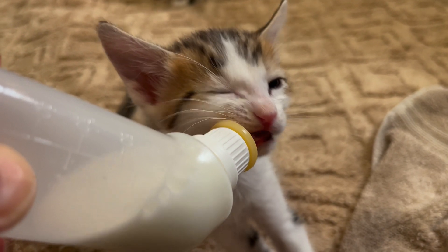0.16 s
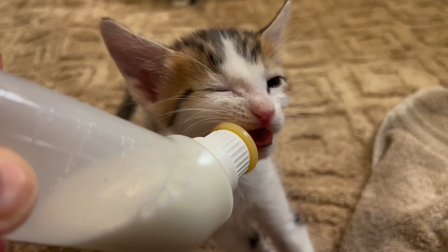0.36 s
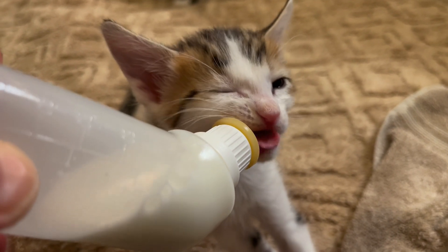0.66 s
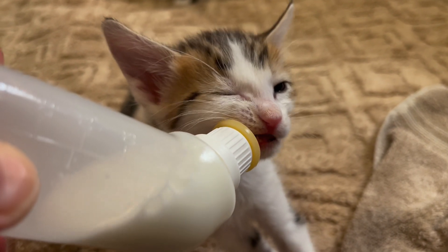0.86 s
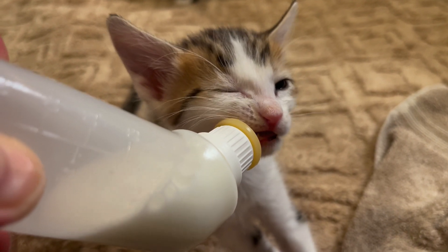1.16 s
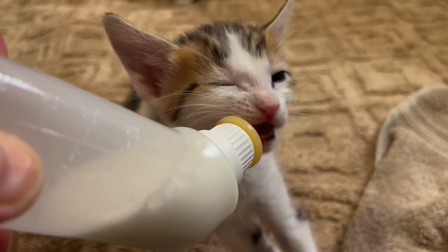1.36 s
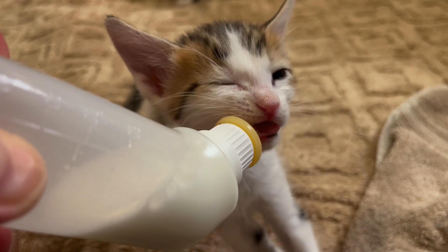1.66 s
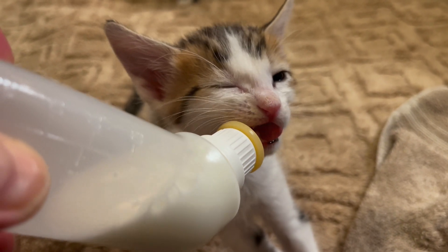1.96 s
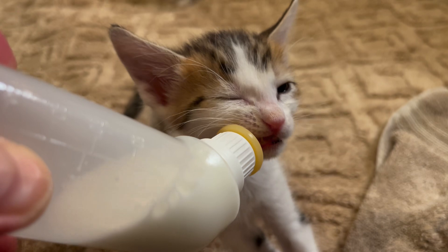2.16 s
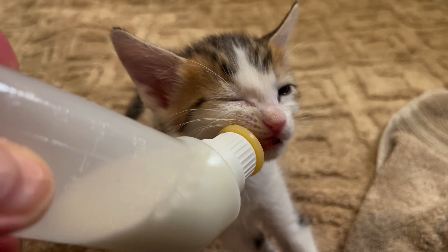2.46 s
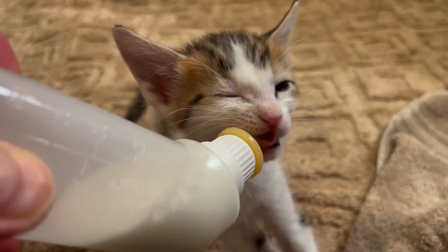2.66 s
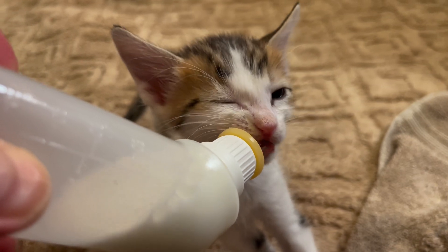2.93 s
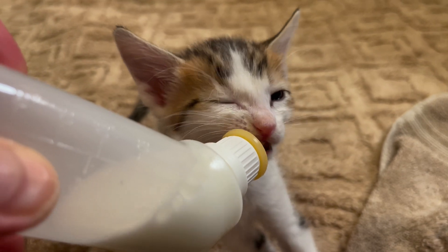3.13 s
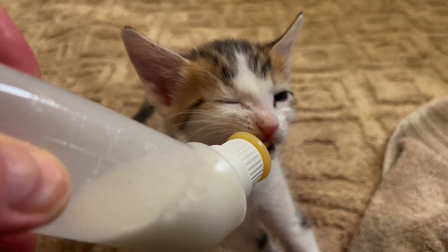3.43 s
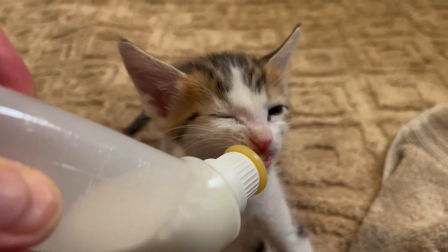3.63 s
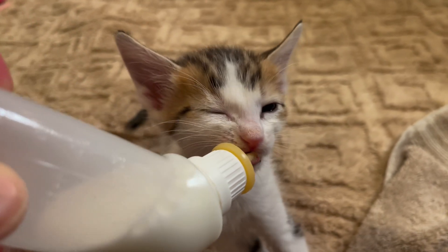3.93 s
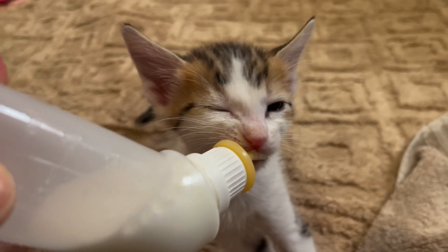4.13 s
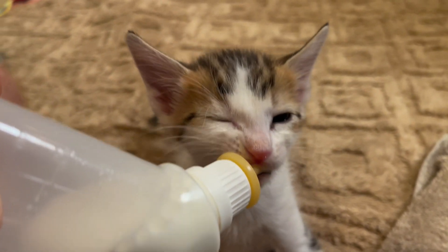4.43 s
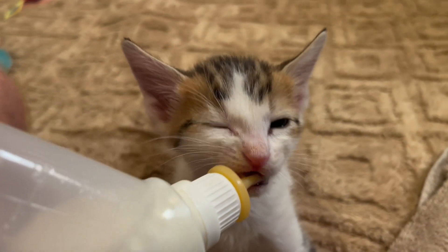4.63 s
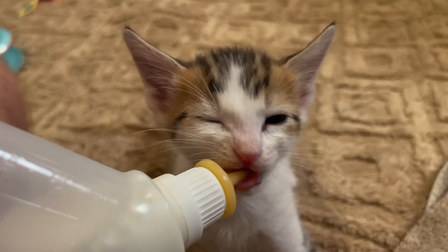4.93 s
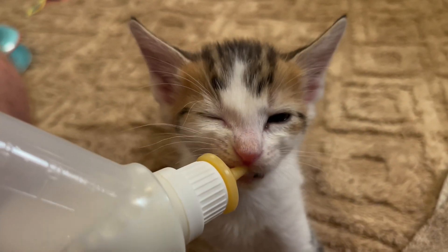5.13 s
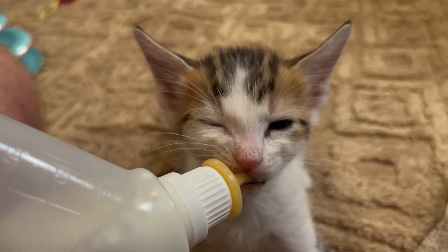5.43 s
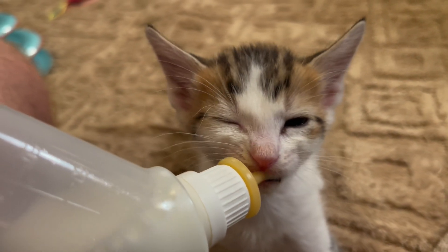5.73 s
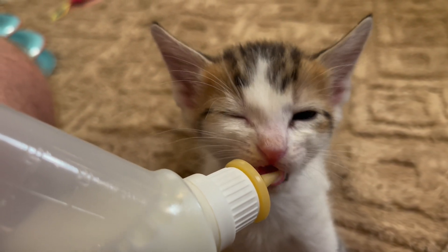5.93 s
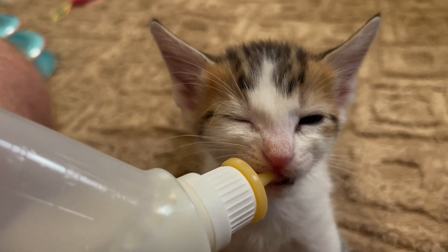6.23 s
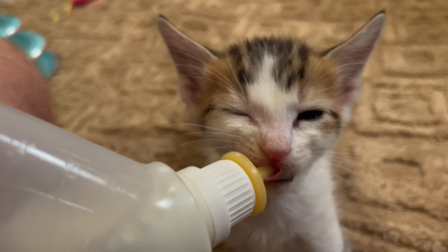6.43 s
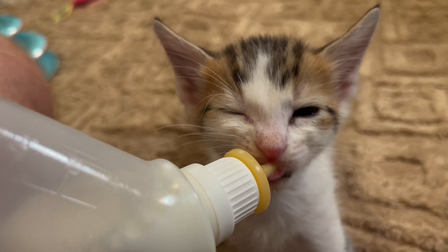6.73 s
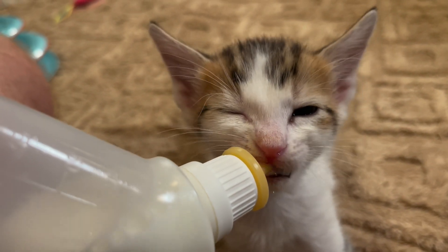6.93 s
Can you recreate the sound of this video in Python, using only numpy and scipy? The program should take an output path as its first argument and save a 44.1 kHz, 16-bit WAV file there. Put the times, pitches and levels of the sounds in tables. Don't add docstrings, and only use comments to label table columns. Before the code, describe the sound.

A kitten sucks milk from a bottle teat a hand's breadth from a stereo microphone in a quiet, soft-furnished room. Sharp, very short wet snaps arrive irregularly, roughly three a second: strong ones at 0.03, 0.33 and 0.96 s, a brief squelchy break at 1.27 and another snap near 1.7. A longer bubbly squelch runs at 1.9 s. Sucks are softer afterwards, with snaps at 2.3, 2.6 and 3.4, a lower squelch at 3.93, then wet smacks around 4.6, 4.85, 5.25 and 5.54. Fizzy bubble runs follow at 5.85 and 6.16, a duller one at 6.43, and crisp snaps at 6.86 and 7.08. Between them are tiny droplet ticks, fine milk fizz and barely audible nasal whispers. Low mains hum and ventilation rumble lie underneath, surging gently just before 3.2 s, then easing; a thin fluttering motor whine grows slightly clearer after 3.5 s.

```python
import sys
import numpy as np
from scipy import signal
from scipy.fft import rfft, irfft, next_fast_len
from scipy.io import wavfile
from scipy.ndimage import uniform_filter1d

SR = 44100
rng = np.random.default_rng(int(sys.argv[2]) if len(sys.argv) > 2 else 0)


def convert_level_to_amplitude(level_db):
    exponent = np.asarray(level_db, float) / 20
    return 10 ** exponent


def bounce(signal):
    frames = np.transpose(np.atleast_2d(signal))
    limited = np.clip(frames, -1, 1)
    pcm = np.round(limited * 32767).astype(np.int16)
    wavfile.write(sys.argv[1], SR, pcm)


N = 312228

# (centre [Hz], width [Hz], level [dB])
MOUTH_MODES = [(4100, 651, -2), (5600, 340, 3.5), (6700, 400, 3)]
# (centre [Hz], width [Hz], level [dB])
CHEEK_MODES = [(1360, 730, 2), (2190, 630, 5), (3000, 900, -11)]
# (centre [Hz], width [Hz], level [dB])
SPRAY_MODES = [(8600, 180, 1.5), (10900, 4500, -3.5)]
# (frequency [Hz], lead of the left [rad], left over right [dB])
PORT_OFFSETS = [(0, 0, 0), (800, 1, 1), (1550, 1, -5), (2050, 6.2, -6), (2600, 6.9, 10), (3100, 8, 10),
                (3500, 12, 0), (4200, 12.8, -2), (5000, 15.3, -1), (6000, 18.8, 2), (6700, 18.3, 1),
                (7300, 20, 1), (8000, 19.5, 1), (16000, 5.6, 0)]
WET_DAMPING, FIZZ_DAMPING = 1.6, 2.0


def evened(x):
    return x / np.sqrt(np.mean(x ** 2) + 1e-20)


def peaked(x):
    return x / (abs(x).max() + 1e-20)


def add(mix, s, sound):
    part = mix[round(s * SR):][:len(sound)]
    part += sound[:len(part)]


def ring(x, hz, width):
    turn = np.exp(2j * np.pi * np.cumsum(hz * np.ones(len(x))) / SR)
    r = np.exp(-np.pi * width / SR)
    return 2 * (turn * signal.lfilter([(1 - r) ** 2], [1, -2 * r, r * r], x / turn)).real


def modes(x, table, scale=1, damping=1):
    return sum((-1) ** k * convert_level_to_amplitude(db) * ring(x, hz * scale, width * damping)
               for k, (hz, width, db) in enumerate(table))


def drift(seconds):
    size = round(seconds * SR)
    once = uniform_filter1d(rng.standard_normal(N), size, mode="wrap")
    return evened(uniform_filter1d(once, size, mode="wrap"))


def kitten():
    out = seethe()
    for sounds in (snaps(), squelches(), droplets(), edges()):
        for s, sound in sounds:
            add(out, s, sound)
    add(out, 0.025, convert_level_to_amplitude(-33.5) * ring(out, 10000, 3600))
    for s, sound in whispers():
        add(out, s, sound)
    return signal.sosfilt(signal.butter(2, 750, "high", fs=SR, output="sos"), out)


def breaks():
    # (time [s], peak [dB], length [ms], mouth re peak [dB], cheek pop re peak [dB])
    seals = [(0.0256, -9, 2.76, -9, -17.5), (0.3313, -15, 1.6, -11, -40), (0.333, -4, 1.3, -18.5, -28),
             (0.616, -38, 1.9, -5, -10.5), (0.959, -2, 1.8, -13.5, -35.5), (0.9597, -17, 2.5, -1.5, -21),
             (1.131, -44, 3.1, -11, -12.5), (1.275, -17.5, 4.2, -8.5, -21),
             (1.2763, -16.5, 0.68, -3.5, -50), (1.591, -30.5, 2.9, -7.5, -16.5),
             (1.6945, -14.5, 6.4, -23.5, -50), (2.3353, -23, 3.3, -28.5, -42), (2.594, -19, 2.2, -8, -20.5),
             (3.3667, -28, 3.6, 1.5, -13), (3.5078, -48, 1.6, 4.5, -2.5), (3.624, -24, 0.41, -5, -24),
             (4.2284, -24, 1.1, -33, -31), (4.849, -34.5, 2.24, -10, -9.5), (4.8534, -27, 4.4, -3.5, -12.5),
             (4.8549, -17, 2.6, -29.5, -31), (5.2529, -8.5, 1.5, -25.5, -52), (5.5402, -26, 4.5, -6.5, -14),
             (6.8616, -12, 2.23, -10, -23), (7.068, -33.5, 0.63, -5.5, -13.5),
             (7.0783, -9.5, 2.5, -5, -21.5)]
    # (time [s], peak [dB], pitch [Hz])
    large = [(1.595, -36, 10900), (1.601, -38, 10400), (1.9053, -38, 10500), (1.9094, -31, 10350),
             (1.9138, -24, 11740), (1.9202, -29, 11600), (1.924, -32, 11250), (1.927, -30, 11240),
             (1.9321, -28, 11100), (1.937, -31, 11300), (1.9446, -25.5, 10200), (1.948, -36.5, 10900),
             (1.954, -41, 10900), (1.9575, -47, 10130), (3.9314, -25, 8155), (3.9346, -24.5, 8180),
             (3.943, -29.5, 7600), (3.961, -34, 6430), (3.966, -36, 6200), (3.9668, -27, 6500),
             (4.5866, -23.5, 6880), (5.2347, -28, 10450), (5.2426, -30, 10060), (5.86, -29, 8900),
             (5.8637, -29, 8900), (5.8711, -24, 8700), (5.8796, -28, 7200), (6.1608, -34.5, 8630),
             (6.1664, -45, 10900), (6.1693, -28, 10050), (6.1782, -35, 6500), (6.1976, -23, 6700)]
    # (time [s], peak [dB], pitch [Hz])
    ticks = [(0.1923, -39, 8460), (0.1941, -39.5, 6740), (0.503, -49, 5700), (0.54, -53.5, 7040),
             (0.661, -47, 7850), (0.8387, -52, 5600), (0.847, -56, 6400), (0.885, -56, 8100),
             (1.144, -47, 7200), (1.4389, -54, 6400), (1.4437, -44, 8380), (2.1033, -36, 8110),
             (2.692, -55, 8190), (3.687, -46.5, 7300), (4.102, -57.5, 7840), (4.5889, -42, 4030),
             (4.1058, -49.5, 5770), (4.85, -36.5, 5200), (5.0482, -55.5, 7360), (5.2634, -42, 8600),
             (5.3884, -53, 6700), (5.5472, -23.5, 5600), (5.940, -53.5, 7250), (6.426, -29, 5180),
             (6.4302, -24, 5450), (6.939, -57.5, 6300)]
    # (time [s], peak [dB])
    pricks = [(.727, -56), (1.4035, -60), (1.668, -55), (1.764, -45), (1.858, -55), (2.4598, -49),
              (2.4982, -52), (2.948, -45.5), (3.339, -64), (3.4878, -44.5), (3.6688, -43), (3.838, -52.5),
              (3.8412, -51.5), (4.0972, -47), (4.2244, -43.5), (4.7, -48), (5.6963, -54), (6.6322, -54.5),
              (6.6528, -60), (6.7596, -45), (6.8497, -49), (6.856, -47.5), (6.8678, -51.5), (6.8725, -48)]
    # (time [s], peak [dB], pitch [Hz])
    lips = [(0.1489, -50, 4100), (0.2634, -48, 2510), (0.271, -56, 2880), (.463, -56.5, 4000),
            (0.569, -57.5, 3630), (0.657, -52, 4000), (0.9131, -54.5, 3740), (1.008, -50, 2480),
            (1.4615, -53.5, 4500), (1.515, -55, 2830), (2.0643, -54.5, 4240), (2.074, -46, 4480),
            (2.187, -66, 2800), (2.431, -54, 4100), (2.682, -56, 2500), (2.779, -57, 4430),
            (2.805, -47.5, 4730), (3.685, -52.5, 1800), (4.144, -52, 4000), (4.149, -50.5, 3320),
            (4.425, -55.5, 2306), (4.466, -53, 5100), (4.476, -61, 3780), (4.762, -57.5, 4000),
            (5.122, -49.5, 2800), (6.561, -59, 3670), (6.693, -54.5, 3340), (7.005, -56, 4000),
            (7.025, -61, 2450)]
    tick_mouth_db, tick_cheek_db = -5, -19.5
    rows = []
    for s, db, *rest in seals:
        hz = 11600 + 38 * db - 140 * s
        rows.append((s, db, hz, *rest))
    for s, db, hz in large:
        mouth_db = -16 + 4 * (10 - hz / 1000)
        rows.append((s, db, hz, 4.54, mouth_db, mouth_db - 15))
    for s, db, hz in ticks:
        rows.append((s, db, hz, 2.6, tick_mouth_db, tick_cheek_db))
    for s, db in pricks:
        rows.append((s, db, 9810, 1.6, tick_mouth_db, tick_cheek_db))
    for s, db, hz in lips:
        cheek_db = 5.5 - 12.5 * (hz / 1000 - 2.4)
        rows.append((s, db, hz, 7 / hz * 1000, -10, cheek_db))
    return rows


def snaps():
    t = np.arange(500) / SR * 1000
    size_spread = .05
    for s, db, hz, ms, mouth_db, cheek_db in breaks():
        noise = rng.standard_normal(len(t))
        mouth_size, cheek_size = 1 + size_spread * noise[-2], 1 + 2 * size_spread * noise[-3]
        u = t / max(ms, .5)
        shape = np.minimum(t / 0.67, 1) * np.exp(-(1.93 * u) ** 2)
        tear = noise * shape
        late = noise[::-1] * u * np.exp(-3.4 * u)

        wobble = evened(uniform_filter1d(noise, size=24)) * np.minimum(u, 1)
        tone = np.sin(2 * np.pi * hz * t / 1000 + 0.58 * wobble[::-1])
        bubble = shape * (1 + .25 * wobble) * tone
        spray = modes(tear, SPRAY_MODES[:1], 1 + size_spread * noise[-1], WET_DAMPING)
        spray = spray + modes(tear, SPRAY_MODES[1:])
        top = peaked(bubble) + .5 * peaked(ring(tear, hz, 0.18 * hz))
        top += convert_level_to_amplitude(-9.0) * (hz / 11000) ** 2 * peaked(spray)

        cavity = peaked(modes(late, MOUTH_MODES, mouth_size, WET_DAMPING))
        cavity = cavity + 0.46 * peaked(ring(late, 5200, 3300))
        cheek = peaked(modes(late, CHEEK_MODES, cheek_size))
        body = convert_level_to_amplitude(mouth_db - 7) * peaked(cavity) + convert_level_to_amplitude(cheek_db) * cheek
        yield s, convert_level_to_amplitude(db) * (peaked(top) + convert_level_to_amplitude(-33.5) * peaked(tear) + body)


def squelches():
    # (start [s], length [s], level [dB], fade over its length [dB], start pitch [Hz])
    runs = [(1.128, 0.026, -55, 11, 8260), (1.27, 0.014, -26.5, 5, 11900), (1.592, 0.0092, -43, -7, 10500),
            (1.9, 0.069, -46, 19.5, 11500), (2.329, 0.012, -34.5, 6, 10240), (3.365, 0.0097, -38, 6, 6500),
            (3.925, 0.043, -40, 1.1, 7800), (4.569, .022, -45, -20.5, 6800),
            (5.231, 0.0213, -34, -14.5, 9950), (5.54, 0.0079, -35, -0.5, 5860),
            (5.852, 0.037, -36, 2.5, 10300), (6.157, 0.0454, -45, -24.5, 9000),
            (6.426, 0.011, -48, -13, 4400)]
    sag_hz_per_s, release_s = 49000, 0.003
    for s, length, db, fade_db, hz in runs:
        n = round(length * SR)
        i = np.arange(n)
        noise, draw, size = rng.standard_normal((3, n))
        bursts = signal.lfilter([1], [1, -.94], (draw > 1.9) * convert_level_to_amplitude(3.0 * size)) + .5
        froth = noise * bursts
        top = evened(ring(froth, hz - sag_hz_per_s * i / SR, 2740))
        top += convert_level_to_amplitude(-2.5) * evened(modes(froth, SPRAY_MODES))
        body = convert_level_to_amplitude(-18.0) * evened(modes(froth, MOUTH_MODES, 1, FIZZ_DAMPING))
        body += convert_level_to_amplitude(-22) * evened(ring(froth, 3340, 5000))
        body += convert_level_to_amplitude(-29.5) * evened(modes(froth, CHEEK_MODES))
        attack = np.minimum(i / 110, 1)
        release = np.minimum(i[::-1] / np.minimum(release_s * SR, n / 4), 1)
        level = convert_level_to_amplitude(db + fade_db * np.linspace(.5, -.5, n))
        yield s, level * (evened(top) + body) * attack * release


def droplets():
    # (time [s], peak [dB], pitch [Hz])
    strays = [(0.502, -50, 9500), (.558, -57, 4500), (.661, -51, 10500), (.683, -59.5, 2300),
              (1.011, -54, 8600), (1.395, -64.5, 4200), (1.422, -59.5, 6000), (1.468, -58, 7000),
              (1.496, -57.5, 6400), (1.735, -55, 4300), (1.749, -51, 7500), (1.748, -60, 2280),
              (1.797, -58, 7500), (1.956, -48, 2100), (1.984, -42, 11300), (2.155, -67, 6000),
              (2.27, -68, 2590), (2.453, -51, 8000), (2.594, -26.5, 8600), (2.735, -60, 6770),
              (2.835, -59, 8500), (2.9467, -58, 2510), (3.017, -62.5, 2500), (3.219, -63, 3000),
              (3.391, -57.5, 2410), (3.522, -56, 4300), (3.56, -66, 3800), (0.3336, -21, 8900),
              (3.823, -60.5, 9000), (4.122, -57, 6000), (4.254, -60, 2600), (4.492, -59, 3600),
              (4.513, -61.5, 3500), (4.589, -40.5, 2300), (4.591, -35, 6750), (5.068, -59, 6800),
              (5.077, -58, 1600), (5.142, -60, 9500), (5.318, -54.5, 6500), (5.379, -60, 6300),
              (5.453, -65, 3800), (5.707, -58.5, 4000), (5.706, -56.5, 8560), (6.8616, -27, 8550),
              (6.075, -64.5, 3800), (6.152, -56, 3920), (6.151, -52.5, 9000), (6.881, -47, 8800),
              (6.965, -63, 6300)]
    for s, db, hz in strays:
        u = np.arange(500) / SR * hz / 9.6
        burst = rng.standard_normal(500) * u * np.exp(-3 * u)
        wide = convert_level_to_amplitude(-10) * peaked(ring(burst, 1.2 * hz, 1.8 * hz))
        yield s, convert_level_to_amplitude(db) * (peaked(ring(burst, hz, 0.37 * hz)) + wide)


def edges():
    # (time [s], peak before a common gain [dB])
    tears = [(0.0258, -37.5), (0.3316, -49), (0.3316, -36), (0.5038, -76), (0.6155, -67), (0.9582, -38),
             (1.1303, -86), (1.2717, -43.5), (1.5916, -61), (1.6946, -45.5), (1.9081, -55), (2.3311, -57),
             (2.593, -43.5), (2.9472, -90), (3.3672, -58), (3.6237, -77), (3.927, -76.5), (4.2273, -62),
             (4.8542, -59), (5.2314, -57), (5.2524, -74), (5.5433, -61.5), (5.8541, -53), (5.8604, -55),
             (6.1636, -60.5), (6.4274, -87.5), (6.8598, -59.5), (7.0774, -43)]
    gain_db, length_ms = 25.5, 2.6
    t = np.arange(300) / SR * 1000
    for s, db in tears:
        spit = rng.standard_normal(300) * np.minimum(t / .3, 1) * np.exp(-(t / length_ms) ** 2)
        yield s, convert_level_to_amplitude(db + gain_db) * peaked(ring(spit, 15000, 3500))


def seethe():
    # (time [s], wetness [dB])
    wetness = [(0.0, 3), (0.37, 2.5), (0.91, -1), (1.12, 2), (2.36, -3), (2.5, 4), (2.92, -7), (3.67, 2.5),
               (5.211, -2.5), (5.5, 2.5), (5.92, -5.5), (6.29, 0), (6.53, -0.5), (7.08, -9.5)]
    wet_db = np.interp(np.arange(N) / SR, *np.transpose(wetness))
    noise, draw = rng.standard_normal((2, N))
    fizz = noise * (1 + 1.1 * signal.lfilter([1], [1, -.97], draw > 3.1))
    dull = bright = 0
    for mode in MOUTH_MODES:
        dull = dull + modes(fizz * convert_level_to_amplitude(4 * drift(0.04)), [mode], 1, FIZZ_DAMPING)
    for mode in SPRAY_MODES:
        damping = FIZZ_DAMPING if mode[1] < 1000 else 1
        bright = bright + modes(fizz * convert_level_to_amplitude(4.6 * drift(0.03875)), [mode], 1, damping)
    return convert_level_to_amplitude(-81.5 + 1.4 * wet_db) * evened(dull) + convert_level_to_amplitude(-81.5 + wet_db) * evened(bright)


def whispers():
    # (time [s], length [s], level [dB], centre [Hz])
    narrow = [(0.418, 0.04, -69, 5460), (0.578, 0.025, -72, 6820), (2.334, 0.086, -68.5, 4950),
              (2.793, .06, -83, 4400), (2.918, 0.072, -72, 3380), (3.095, 0.13, -68.5, 5120),
              (3.397, 0.14, -71.5, 4650), (3.76, 0.059, -74, 5960), (4.303, 0.052, -75, 6050),
              (4.92, 0.057, -63, 4820), (5.297, 0.11, -75, 5700), (5.499, .03, -68, 4760),
              (5.678, 0.079, -70, 4830), (6.38, 0.046, -65.5, 5300)]
    # (time [s], length [s], level [dB], centre [Hz])
    puffs = [(0.835, 0.034, -73.5, 5980), (1.131, 0.11, -63, 6700), (1.133, 0.086, -65, 10200),
             (1.431, 0.077, -73, 7000), (2.45, 0.02, -65, 9800), (3.074, 0.059, -70.5, 7400),
             (3.433, 0.13, -68, 9500), (4.084, 0.033, -59, 10830), (5.34, 0.07, -73, 9000),
             (6.64, 0.037, -65, 10230), (6.754, .04, -69.5, 9000)]
    breaths = [(*row, row[3] / 8.8) for row in narrow]
    breaths += [(*row, 2900) for row in puffs]
    for s, length, db, hz, width in breaths:
        noise = rng.standard_normal(12000)
        u = np.arange(len(noise)) / SR / length
        ragged = convert_level_to_amplitude(2.8 * evened(uniform_filter1d(noise[::-1], size=300)))
        shape = np.minimum(u * 8, 1) * np.exp(-1.5 * u ** 2)
        yield s, convert_level_to_amplitude(db) * evened(ring(noise, hz, width)) * ragged * shape


def ports(x):
    size = next_fast_len(N + 500)
    f, lead, balance_db = np.transpose(PORT_OFFSETS)
    hz = np.fft.rfftfreq(size, 1 / SR)
    half = convert_level_to_amplitude(np.interp(hz, f, balance_db) / 2) * np.exp(.5j * np.interp(hz, f, lead))
    return irfft(rfft(x, size) * np.array([half, 1 / half]), size)[:, :N]


def room(x):
    # (frequency [Hz], time to fall 60 dB [s], level [dB])
    decay = [(1000, .3, 1), (4000, 0.24, 3), (6500, 0.29, -5.5), (9000, 0.49, -2.5), (10300, .26, -5),
             (11500, .27, -3.5), (13060, 0.25, -11), (14060, .15, -30)]
    a, b, c, lumps = rng.standard_normal((4, SR // 2))
    lumps = convert_level_to_amplitude(3.0 * evened(uniform_filter1d(lumps, size=150)))
    hz, t, z = signal.stft(np.array([a, b, c]) * lumps, SR, nperseg=128)
    f, t60, db = np.transpose(decay)
    z *= convert_level_to_amplitude(np.interp(hz, f, db)[:, None] - 60 * t / np.interp(hz, f, t60)[:, None])
    z[1:] *= convert_level_to_amplitude(-8 * np.clip(hz / 1000 - 8.8, 0, 1))[:, None]
    z *= np.clip((t - .002) / .004, 0, 1)
    tails = signal.istft(z, SR, nperseg=128)[1]
    wet = signal.fftconvolve(x[None], tails / np.linalg.norm(tails[0]), axes=1)[:, :N]
    return ports(wet[0]) + 0.8 * wet[1:]


def hum():
    # (frequency [Hz], level [dB], halo width [Hz])
    tones = [(120, -54, 12), (181, -63, 6), (359, -77, 4), (480, -78, 6), (749, -77.5, 8), (1993, -78, 12)]
    t, out = np.arange(N) / SR, np.zeros((2, N))
    for hz, db, width in tones:
        a, b = rng.standard_normal((2, N))
        halo = evened(np.array([ring(a, hz, width), ring(a + b * hz / 500, hz, width)]))
        steady = np.sin(2 * np.pi * hz * t + np.array([[0], [hz / 700]]))
        out += convert_level_to_amplitude(db) * evened((.18 + hz / 500) * halo + steady)
    return out


def whine():
    # (time [s], level [dB])
    course = [
        (0, -82),
        (3.2, -78.5),
        (3.6, -75),
        (7.08, -74.5),
    ]
    s, db = np.transpose(course)
    t = np.arange(N) / SR
    flutter_db = 3.5 * drift(.03)
    tone = np.sin(2 * np.pi * 1833 * t + 0.64 * drift(0.11))
    tone = tone * convert_level_to_amplitude(np.interp(t, s, db) + 3.0 + flutter_db)
    return tone * convert_level_to_amplitude(np.array([[-3], [2]]))


def air():
    # (frequency [Hz], level per Hz [dB])
    spectrum = [(20, -47.5), (40, -25), (60, -4.5), (120, -3.5), (155, -10), (220, -8.5), (410, -19.5),
                (800, -22.5), (1600, -31.5), (2020, -26.5), (2450, -45.5), (7000, -49.5), (11300, -46.5),
                (13000, -74)]
    # (frequency [Hz], likeness [0-1])
    likeness = [(60, 0.36), (150, .83), (360, 0.55), (870, 0.2), (2110, 0.13), (5000, 0.2), (9000, 0.69),
                (10300, 0.82)]
    # (time [s], rise [dB], length [s])
    swells = [
        (.72, 3, .12),
        (2.1, 2, .15),
        (3.17, 5, .12),
        (3.7, 1.5, .15),
    ]
    frames, hz = N // 512 + 5, np.fft.rfftfreq(2048, 1 / SR)
    log_hz, seconds = np.log(hz + 1), np.arange(frames) * 512 / SR
    a, b, c, d, patches = rng.standard_normal((5, 1025, frames))
    patches = uniform_filter1d(uniform_filter1d(patches, size=20, axis=0), size=8, axis=1)

    f, like = np.transpose(likeness)
    same = np.clip(np.interp(log_hz, np.log(f), like), -1, 1)[:, None]
    left = a + 1j * b
    z = np.array([left, same * left + np.sqrt(1 - same ** 2) * (c + 1j * d)])
    f, lead, _ = np.transpose(PORT_OFFSETS)
    z[0] *= np.exp(1j * np.interp(hz, f, lead))[:, None]

    z *= convert_level_to_amplitude(-0.21 * np.outer(np.exp(-(hz / 650) ** 2), seconds - 3.5))
    swell_db = sum(db * np.exp(-((seconds - s) / length) ** 2) for s, db, length in swells)
    z *= convert_level_to_amplitude(np.outer(np.exp(-(hz / 600) ** 2), swell_db))

    f, db = np.transpose(spectrum)
    patch_db = 0.43 + 2.0 * np.exp(-np.log((hz + 1) / 330) ** 2)
    z *= convert_level_to_amplitude(np.interp(log_hz, np.log(f), db)[:, None] + patch_db[:, None] * evened(patches))
    return convert_level_to_amplitude(-52.5) * evened(signal.istft(z, nperseg=2048, noverlap=1536)[1][:, :N])


def rumble():
    surge_s, surge_db, rise_s, fall_s = 3.2, 13, .5, .1
    t = np.arange(N) / SR
    surge = np.clip(np.minimum(1 + (t - surge_s) / rise_s, 1 - (t - surge_s) / fall_s), 0, 1)
    a, b = rng.standard_normal((2, N))
    low = np.array([ring(a + 0.2 * b, 74, 28), ring(a - 0.2 * b, 74, 38)])
    return convert_level_to_amplitude(-56.5 - 0.5 * t + surge_db * surge) * evened(low)


def scene():
    near = kitten()
    return ports(near) + convert_level_to_amplitude(-26.5) * room(near) + air() + hum() + whine() + rumble()


def roll_off(x):
    return signal.sosfilt(signal.butter(12, 16400, fs=SR, output="sos"), x)


def record(dry):
    edge_hz, gate_hz = 11950, 9700
    mid_side = np.array([dry[0] + dry[1], dry[0] - dry[1]]) / 2
    hz, t, z = signal.stft(mid_side, SR, nperseg=512)
    z *= convert_level_to_amplitude(-16 * np.clip((hz - edge_hz) / 1000, 0, 1.3))[:, None]
    smooth = uniform_filter1d(uniform_filter1d(abs(z), size=7, axis=1), size=5, axis=2)
    gate_db = -112 + 8 * (hz < 10700) + 14 * (hz > 12400) - 6 * (hz > 13600)
    z *= (smooth > convert_level_to_amplitude(gate_db)[:, None]) | (hz < gate_hz)[:, None]
    mid, side = signal.istft(z, SR, nperseg=512)[1][:, :N]
    low_cut = signal.butter(2, 45, "high", fs=SR, output="sos")
    return roll_off(signal.sosfilt(low_cut, np.array([mid + side, mid - side])))


dry = scene()
out = record(dry)
bounce(out)
```